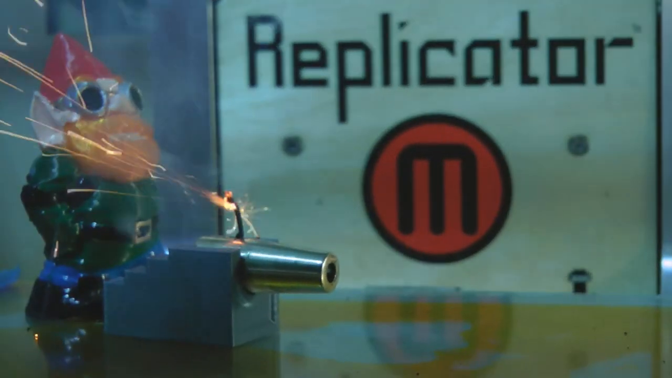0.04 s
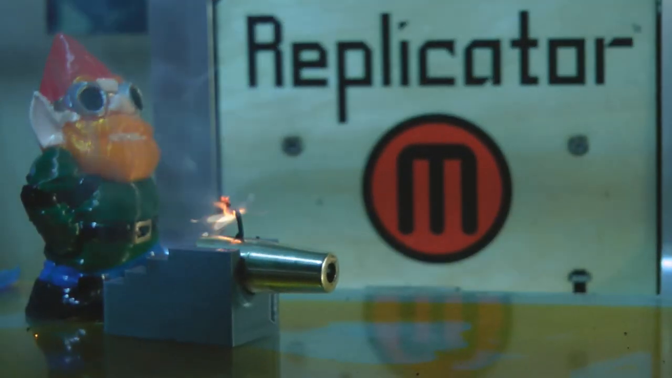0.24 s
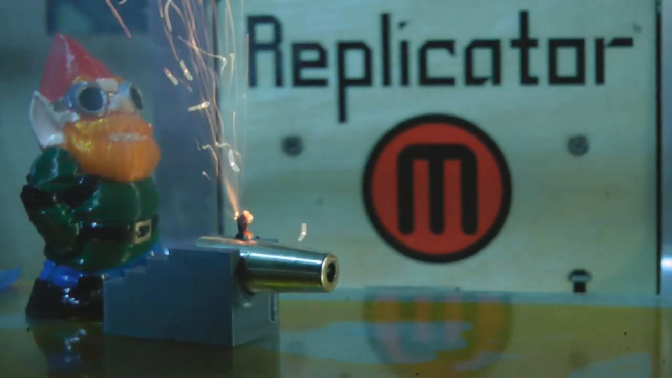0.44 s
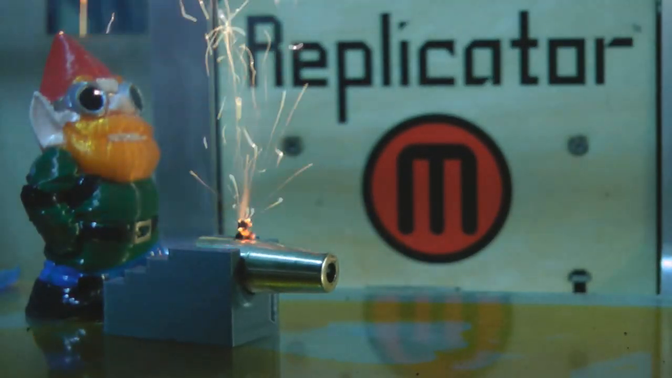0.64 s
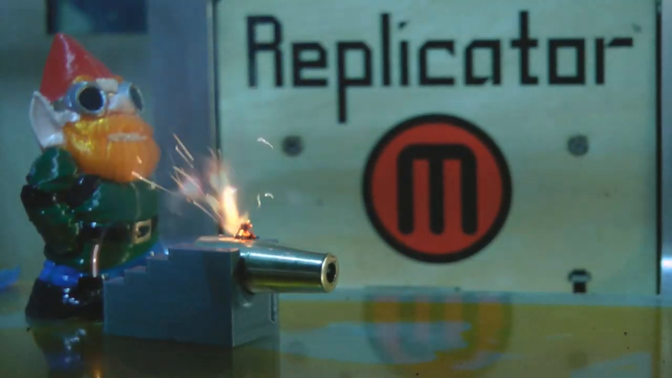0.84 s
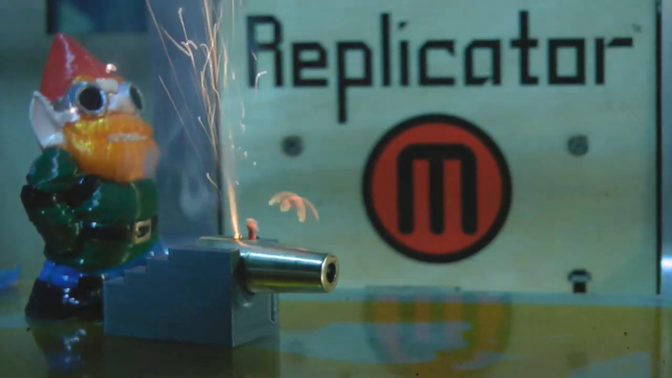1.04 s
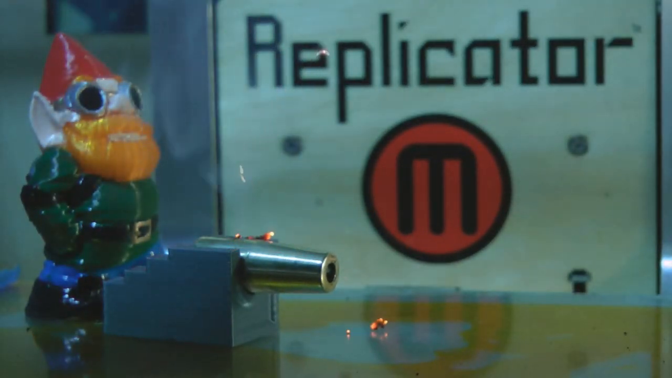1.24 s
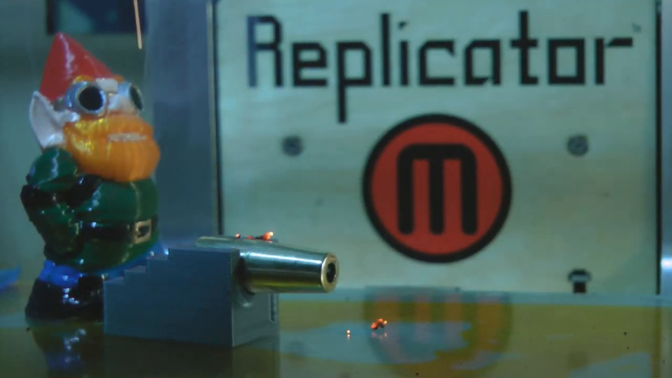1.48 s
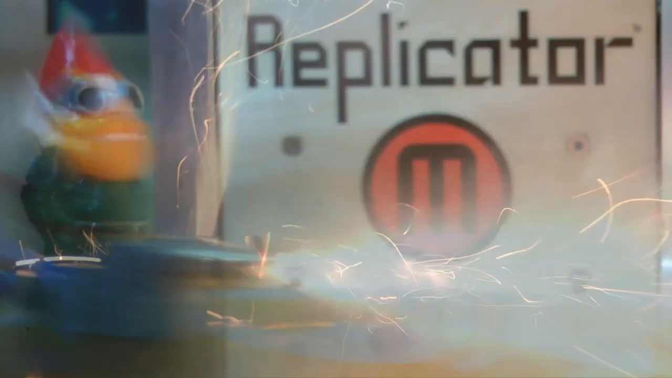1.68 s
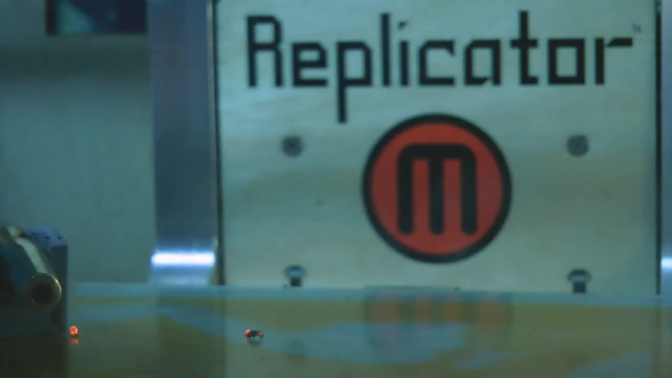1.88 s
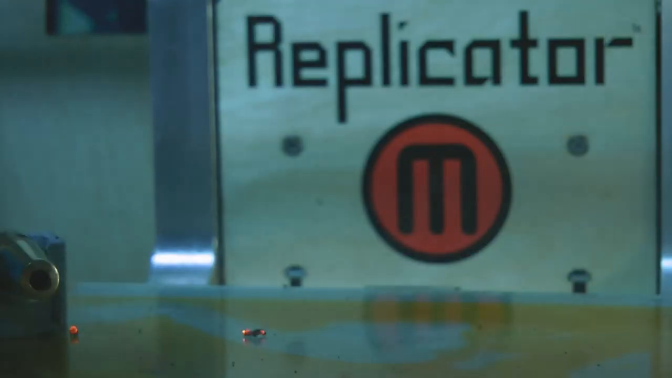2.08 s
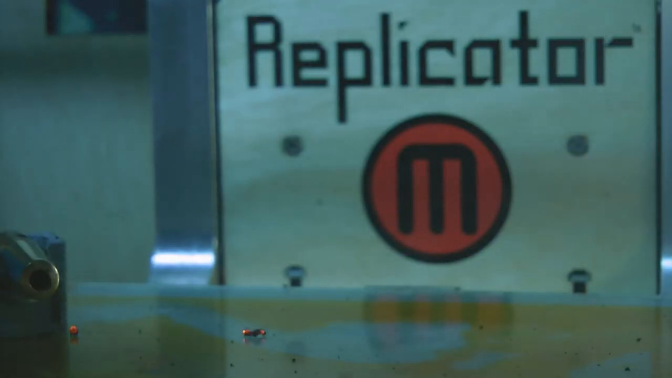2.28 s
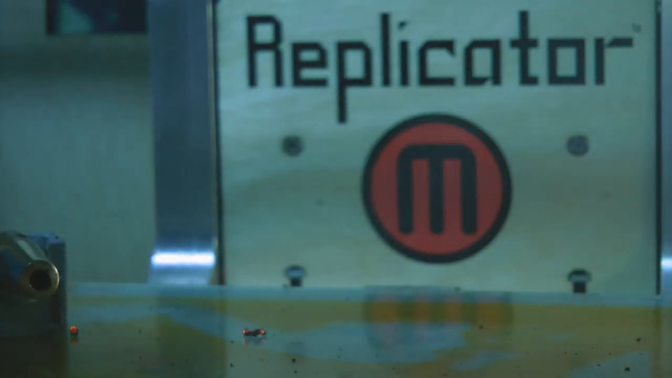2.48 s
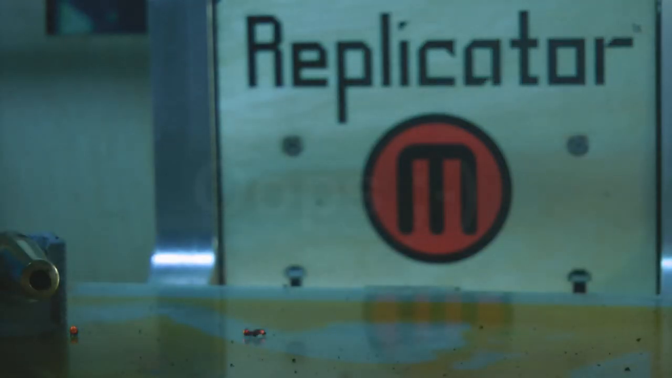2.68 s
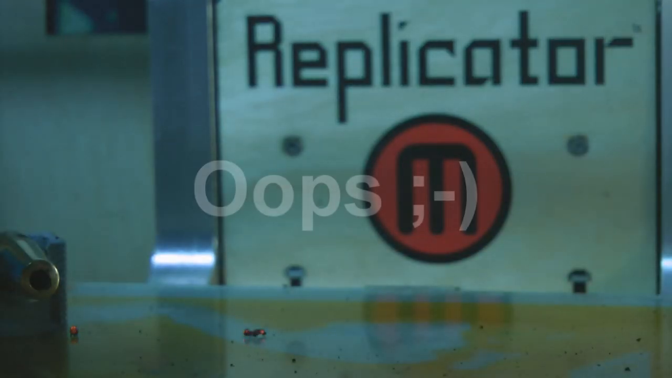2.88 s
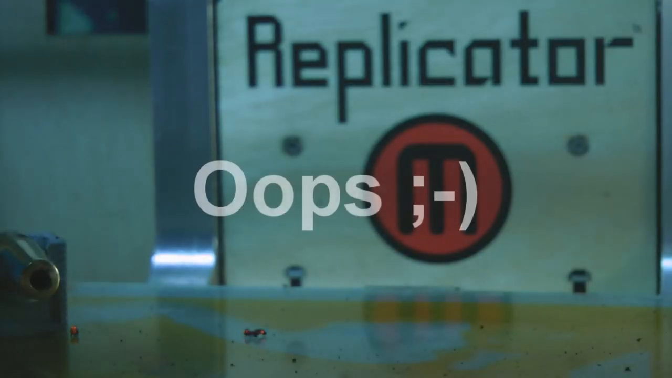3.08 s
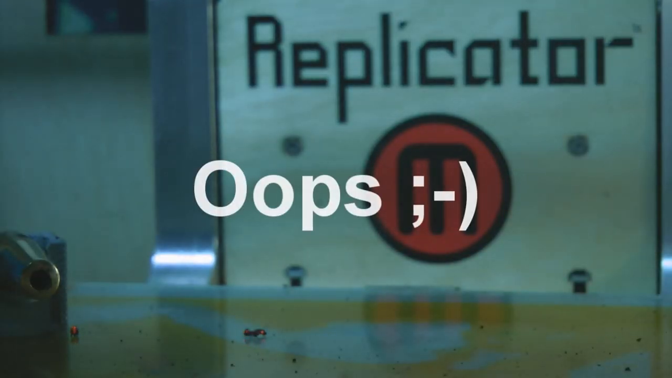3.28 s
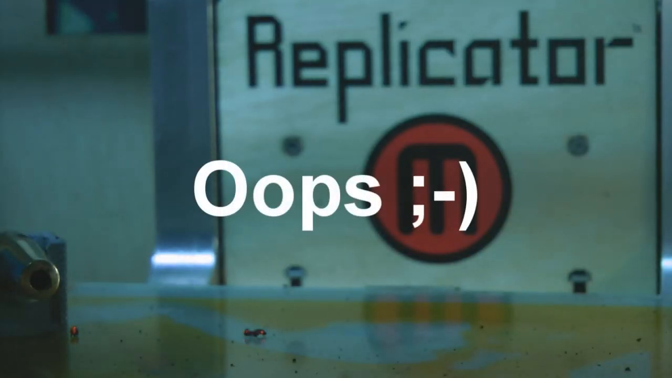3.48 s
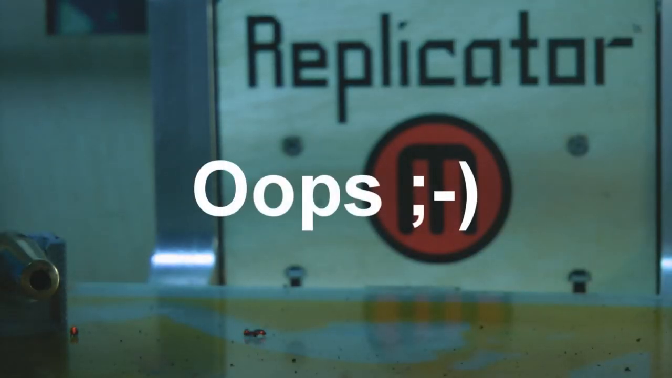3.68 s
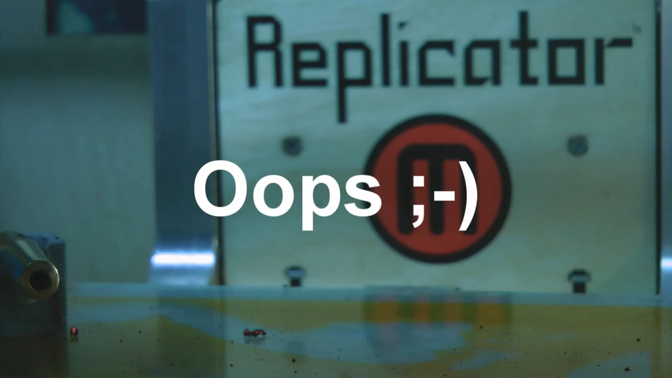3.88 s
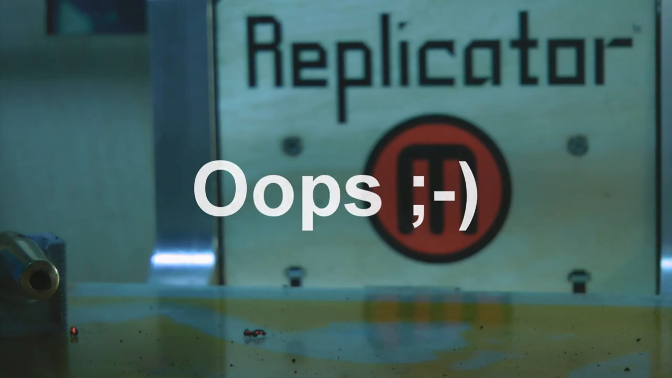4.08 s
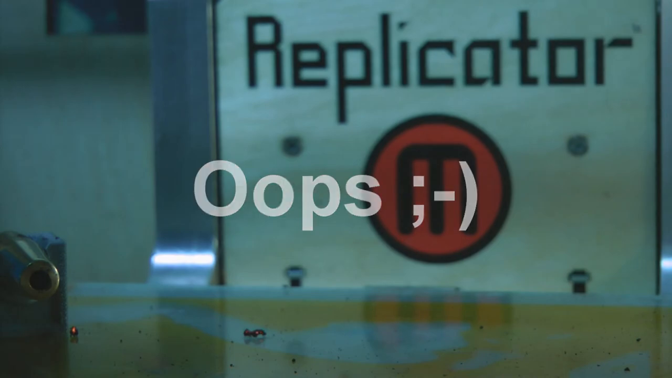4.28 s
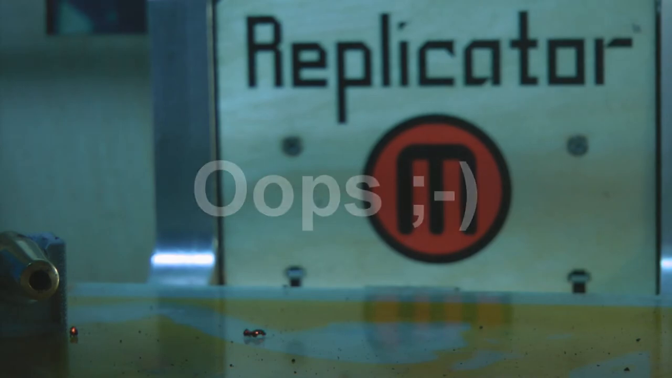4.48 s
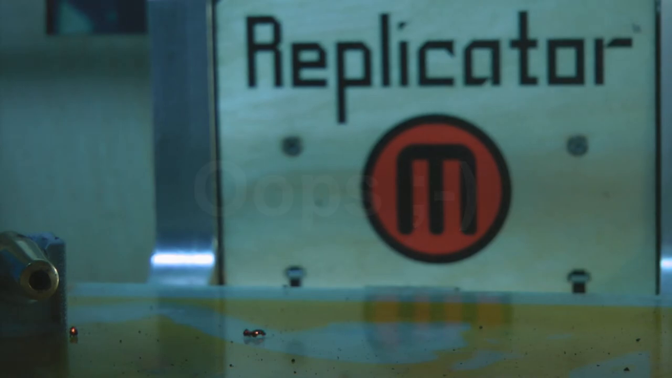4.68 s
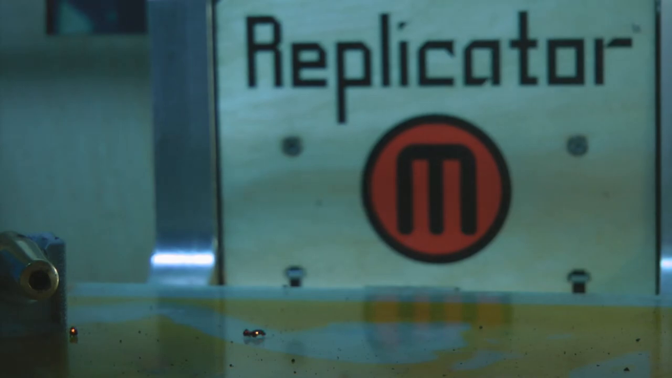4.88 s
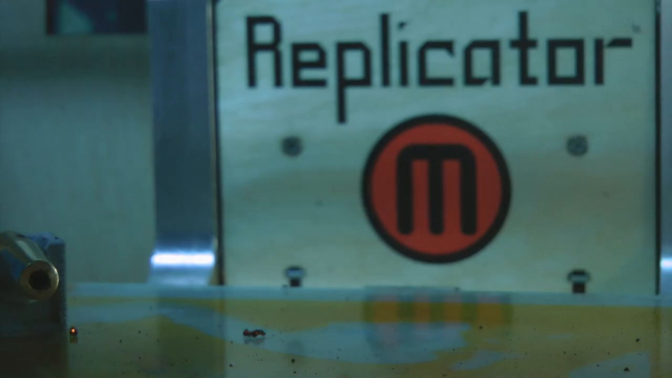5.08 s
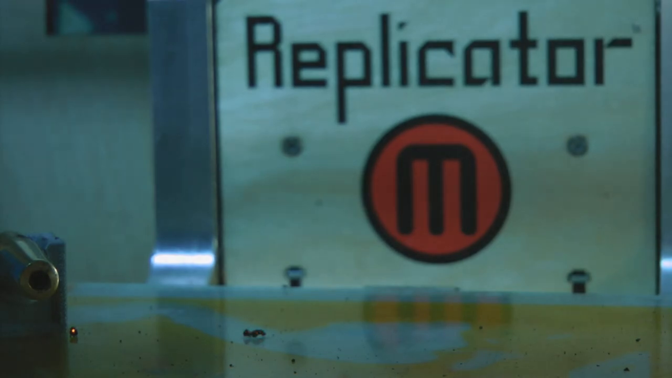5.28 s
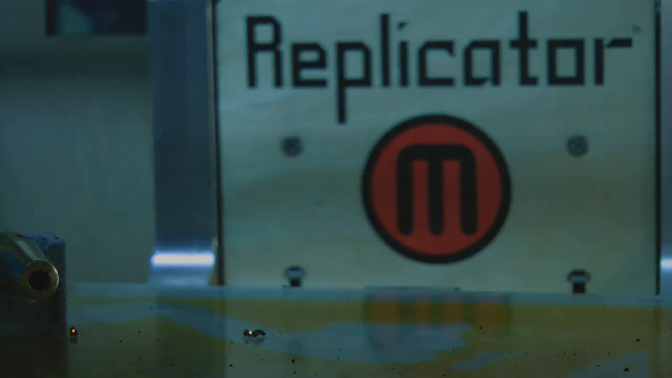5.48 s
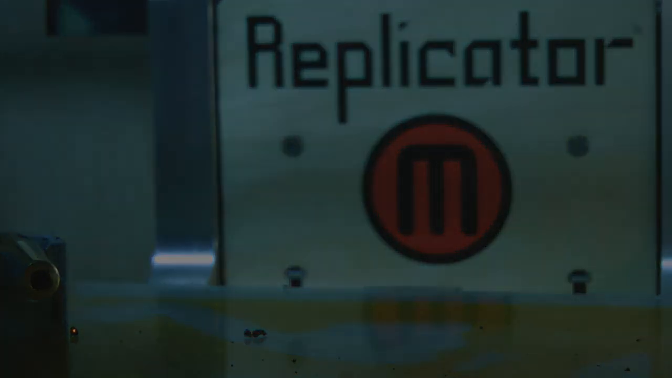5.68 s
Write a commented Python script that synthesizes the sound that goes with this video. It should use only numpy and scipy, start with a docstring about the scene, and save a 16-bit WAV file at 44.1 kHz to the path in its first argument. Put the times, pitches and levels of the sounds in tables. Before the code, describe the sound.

A quiet indoor room with faint ventilation rumble, mains hum and microphone hiss, heard close in mono through a small microphone lacking deep bass. From 0 to about 1.35 s a fuse burns with a bright, uneven gas hiss, fine crackle, low flutter and irregular spat sparks, strongest around 0.5 and 0.75 s. It weakens sharply, leaving faint fizz until 1.75 s. At 1.8 s a tiny cannon fires: one hard, dry crack lasting about a hundredth of a second, with a small carriage kick and thin lingering hiss. At 2.1 s a hollow figure is knocked over, rattling in rapid uneven knocks until 2.3 s, with another at 2.5 s. Small ticks follow at 2.6-2.95 s. Soft bumps and rubs gather from 3.65 to 3.95 s, with a tiny squeak, then a firm double thud and scrape at 4.15 s. Faint rubs and a last bump come at 4.7-4.9 s, then room tone.

```python
"""A burning fuse sputters on a tiny table-top cannon, which fires with one short crack.
The recoil knocks a hollow figure over: its modes ring and rattle; soft thuds, ticks and rubs follow.
Fuse, blast and rubs are shaped noise; knocks, thuds and carriage are decaying sines.
A quiet room with mains hum lies beneath; gain control ducks the level after loud hits."""
import sys
import numpy as np
from scipy import signal
from scipy.fft import rfft, irfft
from scipy.io import wavfile
from scipy.ndimage import uniform_filter1d

SR = 44100
rng = np.random.default_rng(int(sys.argv[2]) if len(sys.argv) > 2 else 0)


def output_pcm(signal):
    """Save a mono or channel-first signal as 16-bit PCM at the path in sys.argv[1].

    Samples are clipped to [-1, 1] before scaling.
    """
    pcm = np.clip(np.atleast_2d(signal).T, -1, 1) * 32767
    wavfile.write(sys.argv[1], SR, np.round(pcm).astype(np.int16))


def decibels_to_gain(level_db):
    """Convert a level in decibels to a linear amplitude gain (20 dB per decade)."""
    exponent = np.asarray(level_db, float) / 20
    return 10 ** exponent


N = 253120
T = np.arange(N) / SR

# Spectra: freq_hz, density_db (relative). Resonances: freq_hz, width_hz, gain_db.
# room air spectrum: freq_hz, density_db; then its level
ROOM_SPECTRUM, ROOM_DB = [(18, -63.5), (30, -32.5), (86, -31), (106, -28.5), (233, -12.5), (280, -9),
                          (355, -2.5), (404, -5), (702, -15.5), (866, -17), (1010, -27.5), (2170, -17.5),
                          (7670, -28), (11100, -21.5), (16000, -32.5)], -58.5
ROOM_RESONANCES = [(364.7, 240, -0.5), (901, 95, -21.5), (1590, 88, -12), (7870, 1500, -9)]
# hum partials: freq_hz, rms_db
HUM_PARTIALS = [(120, -81), (240, -73.5), (360, -69), (988, -86.5), (1186, -84.5)]

# rubs across the table: loudest_s, level_db, rise_db_per_s, fall_db_per_s
RUBS = [(3.474, -57.5, 153, 404), (3.54, -64, 595, 193), (3.756, -61, 900, 650), (3.856, -48.5, 420, 404),
        (3.948, -73, 166, 448.5), (4.158, -42, 5000, 282), (4.27, -60, 60, 302), (4.728, -57.5, 113, 211),
        (4.792, -63, 900, 374.5)]
RUB_SPECTRUM = [(700, -22.5), (1400, 10), (3000, 1.5), (5000, -1), (8200, -21), (10000, -11), (16000, -17)]
RUB_RESONANCES = [(2050, 200, 6.2), (2760, 160, 12.0)]
# squeaks in the rub near 3.9 s: start_s, length_s, rms_db
SQUEAKS = [(3.863, 0.033, -57.5), (3.912, 0.051, -64.5)]
SQUEAK_HZ = 2090

# snaps in and after the blast, then grit on the table: start_s, level_db, pitch_hz, decay_s
TICK_EVENTS = [(1.8010, 6, 2900, .0009), (1.8138, -8, 3500, 0.00034), (1.8162, -10, 5000, 0.00025),
               (1.8185, -12, 8000, 0.0002), (2.0500, -55, 14040, .002), (2.336, -57, 11000, 0.0011),
               (2.348, -50, 12000, 0.0027), (2.443, -55, 10050, .002), (2.5818, -34, 5030, 0.0015),
               (2.8464, -34, 3500, 0.002), (2.853, -36, 3600, 0.0036), (2.9374, -36.5, 10940, 0.0012),
               (3.03, -56, 10160, .003), (4.258, -53, 9000, .004), (4.729, -45, 13000, 0.004)]

# table-top modes: freq_hz, level_db, nominal_t60_s
TABLE_MODES = [(311, -8, 0.059), (353, -24, 0.16), (422.4, 5, 0.058), (490, 3.5, 0.034),
               (562.6, -1.5, 0.11), (742, -16, .04), (1144, -28, 0.05), (1350, -26, 0.03),
               (1780, -24, 0.04), (2010, -19, 0.081)]
# dull thuds: start_s, level_db, upper_modes_db (hardness), lowest_modes_db, ring_factor
THUD_EVENTS = [(2.7434, -52.5, 7, 0.5, 0.5), (3.238, -49, -5, 5.5, 0.54), (3.654, -46, 0, -3, 0.34),
               (3.679, -42, -4, 4, .7), (3.690, -46.5, -7, 5, 0.67), (3.714, -42, -5, 7.5, 0.55),
               (3.801, -41.5, -1.5, -9, 0.66), (3.816, -43.5, -5, 5.5, 0.83), (3.843, -43.5, 13, -10, 0.91),
               (3.94, -40.5, 5, 2, 0.51), (4.1538, -15, -10, 1.5, 0.73), (4.167, -25.5, 7, 8.5, 0.96),
               (4.1905, -28, -2.5, 3, 0.68), (4.21, -33.5, -14, 16.5, 0.83), (4.239, -40.5, -5, 4, 0.72),
               (4.266, -48, 3, 5, 0.67), (4.374, -49, 2, -1, 0.8), (4.922, -39.5, -2, 5, 0.27)]
# table rattle spectrum: freq_hz, density_db
TABLE_RATTLE_SPECTRUM = [(300, -26), (900, -4), (2000, 3), (4000, -7), (6500, -10), (8300, -16),
                         (10000, -11), (16000, -14)]

# figure modes: freq_hz, level_db, nominal_t60_s
FIGURE_MODES = [(270, -20.5, 0.1), (363.6, -9.5, 0.076), (429.4, -11, 0.07), (566, -7, 0.066),
                (618, -3.5, 0.059), (705, 1, 0.079), (784, -1.5, 0.049), (810, -19.5, 0.038),
                (1050, -21, 0.035), (1207, -9, 0.045), (1405, -9, 0.076), (1842, -6, 0.068),
                (1956, 5.5, 0.02), (2260, -7.5, 0.021), (2397, -3.5, 0.021), (2690, -9, 0.047),
                (2960, -24, 0.014)]
# knocks: start_s, level_db, upper_modes_db (hardness), middle_modes_db, ring_factor
KNOCK_EVENTS = [(2.1085, -9, 2, -2.5, 0.63), (2.1249, -12, 1.5, -2, 0.46), (2.148, -40, -10, 2, 0.44),
                (2.1835, -26, -3, 2.5, 1.43), (2.2424, -26, 3, 5, 0.55), (2.2489, -17, 3.5, 3, 0.7),
                (2.2672, -24, -13, 2, 0.75), (2.282, -30, -12, -1, 1.2), (2.3068, -33, 0, 14.5, 0.76),
                (2.3175, -23, -15.5, 0.5, 0.91), (2.348, -39, -8, -1, 0.48), (2.4684, -27.5, -8, -2.5, 3.1),
                (2.5015, -14, 1.5, -5, 0.55), (2.5055, -21, -3, 2.5, 0.45), (2.577, -39.5, -18, -9, 0.42),
                (2.6013, -40, -13, -13, 0.53)]
# figure rattle spectrum: freq_hz, density_db
FIGURE_RATTLE_SPECTRUM = [(300, -33), (1000, -9), (2200, -3.5), (3500, -0.5), (5000, -8), (7500, -25),
                          (11000, -21), (16000, -28)]

# first bright contact of knocks and thuds
CONTACT_SPECTRUM = [(1500, -20), (3000, -1), (4500, -1), (6000, -8), (8000, -20), (11000, -17), (16000, -21)]
# level over the rattle for a -15 dB blow; extra dB per dB of blow
CONTACT_DB, CONTACT_DECAY_S, CONTACT_DB_PER_DB = -4, .0012, .6

# fuse flame: time_s, jet_db, fizz_db
BURN_LEVELS = [(0.0, -44, -46), (0.08, -45.5, -48.5), (0.14, -42, -50), (0.25, -43.5, -48),
               (0.446, -48, -46), (0.5, -41, -47.5), (0.62, -40, -46.5), (0.70, -47.5, -46.5),
               (0.75, -39.5, -47), (0.80, -44.5, -46.5), (1.12, -47.5, -45.5), (1.18, -42, -45.5),
               (1.265, -42, -47), (1.32, -46, -48), (1.39, -59, -51), (1.6, -69.5, -56), (1.69, -69.5, -58),
               (1.755, -69, -67.5), (1.79, -67.5, -61)]
# gas jet spectrum: freq_hz, density_db
JET_SPECTRUM = [(290, -27.5), (500, -13.5), (904, -10), (1080, -5.5), (1270, -24.5), (1430, -6),
                (2080, -1.5), (2470, -4), (2780, -1.5), (3550, -4), (5750, -4), (6490, -8.5), (9000, -9),
                (11700, -34), (19800, -120)]
# gas jet resonances: freq_hz, width_hz, gain_db
JET_RESONANCES = [(1404, 96, 12.5), (1716, 110, 9.5), (2098, 130, 8.5), (2900, 690, 8.5), (3404, 119.6, 8)]
# fine treble fizz spectrum: freq_hz, density_db
FIZZ_SPECTRUM = [(2350, -35.5), (4000, -1), (5310, 1.5), (5800, 3), (7750, -3.5), (10900, 5), (11800, 1.5),
                 (15200, 4.5), (16000, -13.5)]
# fizz resonances: freq_hz, width_hz, gain_db
FIZZ_RESONANCES = [(11100, 300, 9), (16300, 350, 9.5), (9890, 120, 5), (9800, 100, -9.5), (7330, 300, 3),
                   (7420, 120, -9.5), (8270, 300, 3.5), (12400, 300, 3), (11900, 250, -3.5),
                   (13600, 230, 0.5), (14750, 400, 0.5), (6500, 290, -7.5), (4680, 200, -10)]
# low flutter spectrum: freq_hz, density_db
FLUTTER_SPECTRUM = [(120, -32), (250, -8.5), (355, 1.5), (480, -10.5), (800, -15), (1200, -36),
                    (3000, -57.5)]
# loudest sparks spat out: time_s, puff_db, treble_db
SPIT_EVENTS = [(0.0287, -41.5, -56), (0.069, -34.5, -55), (0.1255, -35, -43), (0.147, -34, -33.5),
               (0.187, -36.5, -41), (0.235, -35, -55), (0.304, -38, -51), (0.3332, -34, -40),
               (0.387, -37, -43), (0.424, -41, -49), (0.4984, -29.5, -48), (0.5114, -33, -35),
               (0.532, -40, -42), (0.6064, -36.5, -49), (0.69, -31.5, -51), (0.724, -39, -46),
               (0.74, -33, -46), (0.77, -33.5, -33.5), (1.0584, -40, -36.5), (1.0829, -43, -49),
               (1.1358, -39, -36), (1.1719, -32.5, -36), (1.212, -33.5, -45), (1.262, -37, -44),
               (1.449, -55, -52), (1.61, -66, -45.5)]
PUFF_SPECTRUM = [(1000, -25), (1800, -1.5), (3000, 2.5), (4500, -7), (7000, -4.5), (10000, -23),
                 (16000, -28)]
# flame echoes from table, barrel and back board: delay_s, gain
FLAME_ECHOES = [(.00072, 0.16), (.00038, -0.16), (0.0016, 0.22), (0.0059, 0.084), (.0083, 0.18)]
FLUTTER_DB, FLUTTER_DB_PER_JET_DB = -53, 0.61  # at a jet of -38 dB
# weaker spits at random times, level over the flame
SMALL_SPIT_COUNT, SMALL_SPIT_DB, SMALL_SPIT_SCATTER_DB, SMALL_SPIT_SPAN_S = 24, 0.5, 4.5, 1.3
SPIT_DECAY_S, SPIT_RISE_S = 0.0019, 0.00056
CRACKLE_PER_S, CRACKLE_DB, CRACKLE_SCATTER_DB = 350, -6.5, 4  # grains, level over the fizz

# muzzle blast: vent opens, pressure builds to muzzle exit, then empties: time_s, level_db
BLAST_LEVELS = [(1.7912, -63), (1.7925, -14.5), (1.7955, -13.5), (1.8015, 0.5), (1.803, -11),
                (1.809, -15.5), (1.817, -37.5), (1.826, -52.5)]
# blast spectrum: freq_hz, density_db
BLAST_SPECTRUM = [(410, -43.5), (700, -17), (1140, -9.5), (2330, -4.5), (2700, 2), (3600, -9.5),
                  (4260, 0.5), (4730, -6), (8210, -5.5), (8650, -10), (9350, 2.5), (11500, 0.5),
                  (16000, -7.5)]
# carriage modes: freq_hz, level_db, t60_s
CARRIAGE_MODES = [(230, -7, 0.016), (339, -7.5, .016), (426, -2.5, .016), (514, -4, 0.017),
                  (647, -7, 0.015)]
# recoil jolts: start_s, level_db
RECOIL_KICKS = [(1.7923, -27), (1.795, -17.5), (1.8015, -7.5), (1.8046, -11), (1.8165, -36)]
# lingering smoke and echo spectrum: freq_hz, density_db
LINGER_SPECTRUM = [(590, -41), (1000, -19), (1110, -8), (1520, -6), (2910, -1.5), (6630, -8), (8070, -12),
                   (9940, -5.5), (16000, -28)]
LINGER_START_S, LINGER_END_S, LINGER_DB, LINGER_SLOPE_DB_PER_S = 1.826, 2.1, -47, -19


def curve(table, column=1):
    """Level in dB over time from table rows; silent outside them."""
    rows = np.array(table, float)
    return np.interp(T, rows[:, 0], rows[:, column], left=-200, right=-200)


def colour(x, points, peaks=()):
    """Minimum-phase filter from a spectrum plus resonances; rms 1 for white noise of rms 1."""
    hz = np.maximum(np.arange(2049) * SR / 4096, 1)
    point_hz, point_db = np.array(points).T
    db = np.interp(np.log(hz), np.log(point_hz), point_db)
    db = db + sum(g / (1 + (2 * (hz - f) / w) ** 2) for f, w, g in peaks)
    # fold the cepstrum to make the response causal
    cepstrum = irfft(np.log(decibels_to_gain(db)))
    cepstrum[1:2048] *= 2
    cepstrum[2049:] = 0
    response = irfft(np.exp(rfft(cepstrum)))
    return signal.fftconvolve(x, response / np.sqrt(np.sum(response ** 2)))[:N]


def walk(rate_hz):
    """Random levels held 1 / rate_hz s, then smoothed twice; spread near 1."""
    k = int(SR / rate_hz)
    held = np.repeat(rng.standard_normal(N // k + 1), k)
    return 1.3 * uniform_filter1d(uniform_filter1d(held, k), k)[:N]


def noise():
    """White noise of rms 1."""
    return rng.standard_normal(N)


def add(out, start_s, sound):
    """Mix a short sound into out at start_s."""
    i = int(start_s * SR)
    out[i:i + len(sound)] += sound[:N - i]


def highpass(x, order, cutoff_hz):
    """Butterworth low cut."""
    return signal.sosfilt(signal.butter(order, cutoff_hz, "high", fs=SR, output="sos"), x)


def room():
    """Ventilation rumble wavering below 900 Hz, steady microphone hiss above, and mains hum."""
    air = colour(noise(), ROOM_SPECTRUM, ROOM_RESONANCES)
    low = signal.sosfilt(signal.butter(2, 900, fs=SR, output="sos"), air)
    air = air + low * (decibels_to_gain(2.2 * walk(40)) - 1)
    hum = sum(decibels_to_gain(db + 0.5 * walk(8.9)) * np.sqrt(2) * np.sin(2 * np.pi * hz * T)
              for hz, db in HUM_PARTIALS)
    return decibels_to_gain(ROOM_DB) * air + hum


def scrape():
    """Rubbing is rough coloured noise; the squeak is one sine of wavering pitch."""
    rub = colour(noise(), RUB_SPECTRUM, RUB_RESONANCES)
    press = sum(decibels_to_gain(db - np.where(T < s, rise * (s - T), fall * (T - s))) for s, db, rise, fall in RUBS)
    squeak_hz = SQUEAK_HZ * (1 + 0.0034 * walk(60))
    squeak = np.sqrt(2) * np.sin(2 * np.pi * np.cumsum(squeak_hz) / SR)
    squeak_level = sum(decibels_to_gain(db) * np.clip(np.minimum(T - s, s + length - T) / .008, 0, 1)
                       for s, length, db in SQUEAKS)
    roughness = decibels_to_gain(1.5 * walk(80) + 3.0 * walk(400))
    return press * roughness * rub + squeak_level * squeak


def ticks():
    """Hard clicks: a decaying noise snap through a broad resonance, plus its treble edge."""
    out, t = np.zeros(N), T[:SR // 40]
    for start_s, level_db, pitch_hz, decay_s in TICK_EVENTS:
        pole = np.exp(-np.pi * .4 * pitch_hz / SR)
        snap = rng.standard_normal(len(t)) * np.exp(-t / decay_s)
        poles = [1, -2 * pole * np.cos(2 * np.pi * pitch_hz / SR), pole ** 2]
        tone = signal.lfilter([1 - pole, 0, pole - 1], poles, snap)
        add(out, start_s, decibels_to_gain(level_db) * (tone + 0.17 * np.diff(snap, prepend=0)))
    return out


def strike(modes, events, rattle_spectrum, rattle_db, rattle_db_per_db, contact_s, scatter_db,
           rattle_s, tail_db, tail_s, group_hz, high_hz):
    """Each blow rings the same modes with its own weights, plus rattle, bright contact and blurred tail."""
    ringing, shake, contact, t = np.zeros(N), np.zeros(N), np.zeros(N), T[:SR // 2]
    hz, db, t60 = np.array(modes).T[:, :, None]
    sign = (-1.) ** np.arange(len(modes))[:, None]  # neighbouring modes start in opposite directions
    push = 1 - np.exp(-(t / contact_s) ** 2)
    shake_fade = np.exp(-t / rattle_s) + 0.049 * np.exp(-t / (5 * rattle_s))
    chance = rng.standard_normal((len(events), 2, len(modes), 1))
    upper = hz > high_hz
    group = (hz > group_hz[0]) & (hz < group_hz[1])
    for (s, level_db, upper_db, group_db, ring), (level_chance, pitch_chance) in zip(events, chance):
        weight = sign * decibels_to_gain(db + scatter_db * level_chance + upper_db * upper + group_db * group)
        sines = np.sin(2 * np.pi * hz * (1 + .02 * pitch_chance) * t)
        blow_t60 = t60 * np.where(upper, 1.15 * min(ring, .8), max(ring, .1))
        waves = weight * sines * np.exp(-np.log(1000) * t / blow_t60)
        add(ringing, s, decibels_to_gain(level_db) * waves.sum(axis=0) * push)
        shake_db = level_db + rattle_db + rattle_db_per_db * upper_db
        add(shake, s, decibels_to_gain(shake_db) * push * shake_fade)
        contact_db = shake_db + CONTACT_DB + CONTACT_DB_PER_DB * (level_db + 15)
        add(contact, s + contact_s, decibels_to_gain(contact_db) * np.exp(-t / CONTACT_DECAY_S))
    out = ringing * decibels_to_gain(3.1 * walk(140))  # rocking contact damps the ring unevenly
    out += shake * decibels_to_gain(4.0 * walk(500)) * colour(noise(), rattle_spectrum)
    out += contact * colour(noise(), CONTACT_SPECTRUM)
    # table and nearby walls scatter every blow
    scatter = rng.standard_normal(len(t)) * np.exp(-t / tail_s) * (t > .003)
    out += decibels_to_gain(tail_db) * signal.fftconvolve(out, scatter / np.sqrt(np.sum(scatter ** 2)))[:N]
    return highpass(out, 3, 210)  # small objects radiate no deep bass


def table_thuds():
    """Slower, softer contacts excite the low modes of the table top."""
    return strike(TABLE_MODES, THUD_EVENTS, TABLE_RATTLE_SPECTRUM, rattle_db=-19.5, rattle_db_per_db=0.82,
                  contact_s=0.0015, scatter_db=0.99, rattle_s=0.006, tail_db=-7.5, tail_s=0.029,
                  group_hz=(200, 400), high_hz=900)


def figure_clatter():
    """Short hard contacts excite the modes of the hollow figure."""
    return strike(FIGURE_MODES, KNOCK_EVENTS, FIGURE_RATTLE_SPECTRUM, rattle_db=-11.5,
                  rattle_db_per_db=0.79, contact_s=0.00042, scatter_db=3.7, rattle_s=0.003,
                  tail_db=-13, tail_s=0.025, group_hz=(1000, 1600), high_hz=1600)


def spits(jet_db, fizz_db):
    """Envelopes of spat sparks, listed and random: midrange puffs and treble snaps."""
    puffs, snaps, t = np.zeros(N), np.zeros(N), T[:SR // 10]
    fade = np.exp(-t / SPIT_DECAY_S) * (1 - np.exp(-t / SPIT_RISE_S))
    fade = fade / fade.max()
    draws = rng.random((SMALL_SPIT_COUNT, 2)) * (SMALL_SPIT_SPAN_S, 2 * SMALL_SPIT_SCATTER_DB)
    draws = draws + (.001, SMALL_SPIT_DB - SMALL_SPIT_SCATTER_DB)
    small = [(s, jet_db[int(s * SR)] + db, fizz_db[int(s * SR)] + db) for s, db in draws]
    for s, puff_db, treble_db in SPIT_EVENTS + small:
        add(puffs, s - .001, decibels_to_gain(puff_db) * fade)  # starts ahead, peaks near s
        add(snaps, s - .001, decibels_to_gain(treble_db) * fade)
    return puffs, snaps


def fuse():
    """A sputtering gas jet, finer fizz, low flutter and spat sparks; near surfaces echo the flame."""
    jet_db, fizz_db = curve(BURN_LEVELS), curve(BURN_LEVELS, column=2)
    sputter_db = 0.82 * walk(25) + 1.0 * walk(60) + 1.8 * walk(200)
    jet = decibels_to_gain(jet_db + sputter_db) * colour(noise(), JET_SPECTRUM, JET_RESONANCES + FIZZ_RESONANCES)
    hiss = colour(noise(), FIZZ_SPECTRUM, FIZZ_RESONANCES)
    lit = T < BURN_LEVELS[-1][0]
    flutter_db = FLUTTER_DB + FLUTTER_DB_PER_JET_DB * (jet_db + 38) + 2.9 * walk(30)
    flutter = lit * decibels_to_gain(flutter_db) * colour(noise(), FLUTTER_SPECTRUM)
    puffs, snaps = spits(jet_db, fizz_db)
    grain_level = decibels_to_gain(CRACKLE_DB + CRACKLE_SCATTER_DB * rng.exponential(size=N))
    grains = (rng.random(N) < CRACKLE_PER_S / SR) * grain_level
    crackle = signal.lfilter([1], [1, -np.exp(-1 / (0.00038 * SR))], grains)  # 0.38 ms decay
    fizz = (decibels_to_gain(fizz_db + 0.49 * sputter_db) * (1 + crackle) + snaps) * hiss
    jet = jet * (1 + 0.55 * crackle)
    flame = jet + fizz + puffs * colour(noise(), PUFF_SPECTRUM, FIZZ_RESONANCES)
    echoes = sum(gain * np.roll(flame, int(delay_s * SR)) for delay_s, gain in FLAME_ECHOES)
    return flame + echoes + flutter


def shot():
    """Gas bursts out for about 0.01 s in ragged puffs, the carriage kicks, a faint hiss hangs on."""
    out = decibels_to_gain(curve(BLAST_LEVELS) + 3.5 * walk(900)) * colour(noise(), BLAST_SPECTRUM)
    t = T[:SR // 10]
    ring = sum(decibels_to_gain(db) * np.sin(2 * np.pi * hz * t) * 1000. ** (-t / t60) for hz, db, t60 in CARRIAGE_MODES)
    for start_s, level_db in RECOIL_KICKS:
        add(out, start_s, decibels_to_gain(level_db) * ring)
    out = highpass(out, 1, 200)  # a tiny gun moves no deep bass
    hanging = (T > LINGER_START_S) & (T < LINGER_END_S)
    linger_db = LINGER_DB + LINGER_SLOPE_DB_PER_S * (T - LINGER_START_S) + 1.12 * walk(26)
    return out + hanging * decibels_to_gain(linger_db) * colour(noise(), LINGER_SPECTRUM)


def scene():
    """Sum of all sources on one table, in one channel."""
    mix = room() + scrape() + ticks() + table_thuds() + figure_clatter() + fuse() + shot()
    return mix[None]


def band_limit(x):
    """A steep low-pass at the top of the band."""
    return signal.sosfilt(signal.butter(12, 16520, fs=SR, output="sos"), x)


def record(dry):
    """Small microphone without deep bass; gain falls with 0.15 s loudness; the loudest peaks round off."""
    dry = highpass(dry, 2, 110)
    loud = signal.lfilter([1], [1, -np.exp(-1 / (.15 * SR))], dry[0] ** 2) / (.15 * SR)
    gain = (1 + loud / decibels_to_gain(-38) ** 2) ** -.14
    rounded = .72 * np.tanh(dry * gain / .72)
    treble_cut = signal.ellip(12, .3, 55, 15760, fs=SR, output="sos")
    mix = signal.sosfilt(treble_cut, rounded)
    return band_limit(mix)


dry = scene()
out = record(dry)
output_pcm(out)
```